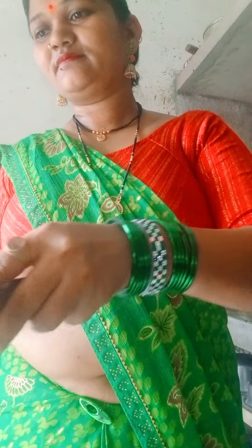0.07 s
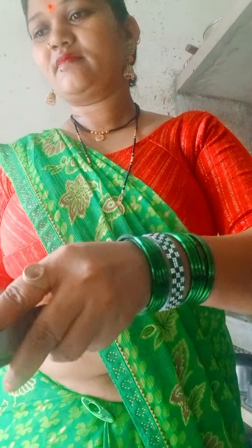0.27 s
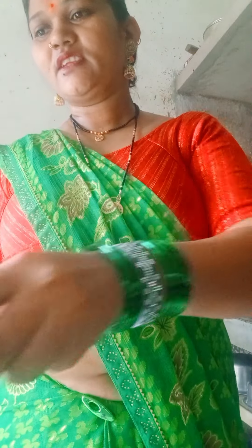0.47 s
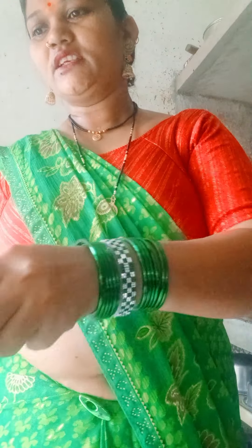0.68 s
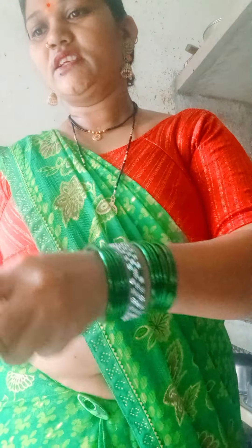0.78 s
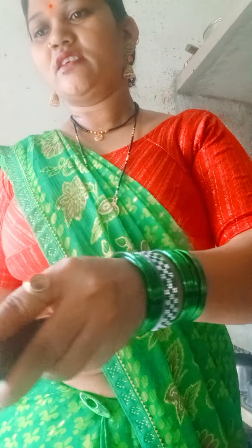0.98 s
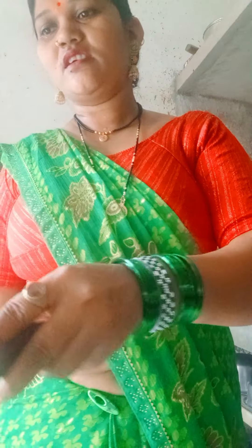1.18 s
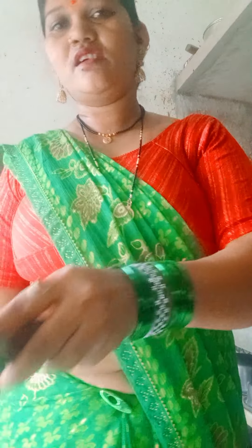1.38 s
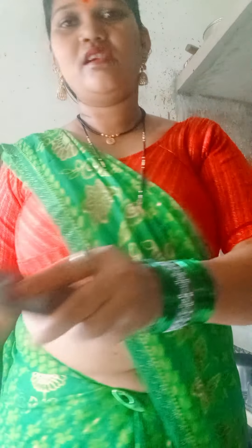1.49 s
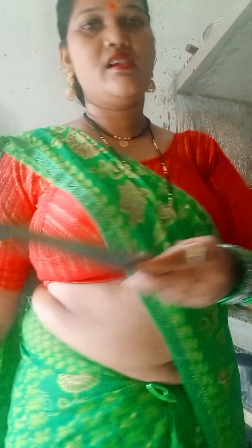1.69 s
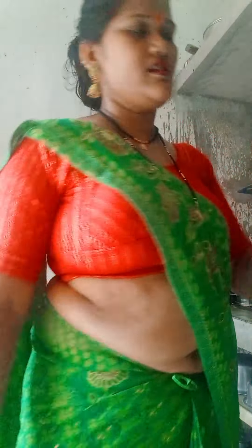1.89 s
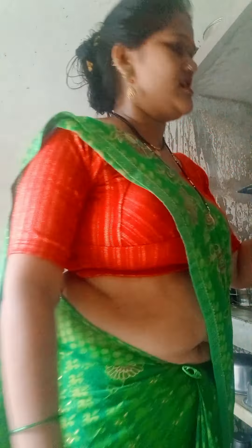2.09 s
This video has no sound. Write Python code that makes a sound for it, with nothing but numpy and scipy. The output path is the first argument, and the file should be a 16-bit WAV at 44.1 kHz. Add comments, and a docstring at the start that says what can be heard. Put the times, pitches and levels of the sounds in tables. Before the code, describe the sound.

In a small, faintly hissing kitchen, glass bangles rattle near the microphone as a wrist works to and fro. The dense, knocking clatter stops, and a few bright, ringing glass clinks follow.

```python
"""Glass bangles, stacked on a wrist, work to and fro close by in a small, faintly hissing kitchen.
Each stroke is a dense, dull clatter, likely the pressed stack and whatever the hand is working:
short damped knocks over a grinding rattle of tiny contacts, all exciting the modes of the stack.
Sliding adds faint gliding resonances. Then the arm swings away and a few loose bangles collide
and vibrate freely, clinking high and clear."""
import sys
import numpy as np
from scipy import signal
from scipy.fft import rfft, irfft
from scipy.io import wavfile
from scipy.ndimage import uniform_filter1d, minimum_filter1d

SR = 44100
rng = np.random.default_rng(int(sys.argv[2]) if len(sys.argv) > 2 else 0)


def log_audio(samples):
    """Write samples as a 16-bit WAV file to the path given in sys.argv[1]."""
    # one column per channel
    frames = np.atleast_2d(samples).T
    # limit to full scale, then quantise
    limited = np.clip(frames, -1, 1)
    pcm = np.round(limited * 32767).astype(np.int16)
    wavfile.write(sys.argv[1], SR, pcm)


N = 94770

# Spectrum of the room's hiss: frequency_hz, level_db
HISS_SPECTRUM = [(30, -16.5), (130, 1.5), (300, -0.5), (700, 3.5), (1400, 10.5), (2200, -20.5),
                 (3200, -22.5), (5000, -26.5), (9000, -29), (16000, -46)]
# Envelope of the rattle in four bands: time_s, low_db, middle_db, bright_db, treble_db
RATTLE_ENVELOPE = [(0, -27, -15.5, -21.5, -38), (0.1, -26.5, -14.5, -30, -50),
                   (0.171, -27.5, -18, -31.5, -85), (.228, -80.5, -25, -39, -80),
                   (0.242, -23, -11, -22.5, -41.5), (0.309, -26, -17.5, -16.5, -36),
                   (.38, -20, -7, -17.5, -39), (0.429, -21.5, -14, -18, -43.5),
                   (.485, -31.5, -20.5, -31.5, -53.5), (0.516, -28, -23, -24, -58),
                   (0.576, -84, -34, -61, -80), (0.59, -33, -13.5, -16.5, -36.5),
                   (0.618, -35.5, -22, -24.5, -52), (0.641, -25, -7.5, -18.5, -44),
                   (0.677, -40, -18.5, -22.5, -35.5), (0.718, -81.5, -31, -32.5, -61),
                   (0.736, -70.5, -26, -24.5, -35), (0.761, -84.5, -28.5, -29.5, -70),
                   (0.785, -31, -27, -23, -44.5), (0.821, -47, -19.5, -33.5, -71),
                   (0.86, -69, -34.5, -39.5, -84), (0.872, -43.5, -15, -20.5, -41),
                   (.92, -33.5, -16, -21.5, -36.5), (.98, -34.5, -16.5, -20, -46.5),
                   (1.031, -35, -23, -52, -56), (1.07, -64.5, -32.5, -59, -96),
                   (1.145, -74, -42.5, -56, -87), (1.156, -69, -13, -29, -48),
                   (1.188, -25.5, -12.5, -25, -41.5), (1.226, -22.5, -16, -21.5, -43.5),
                   (1.286, -38.5, -16.5, -32, -61.5), (1.326, -27, -16, -25.5, -40),
                   (1.371, -23.5, -22.5, -19.5, -71), (1.396, -23.5, -12.5, -42, -37.5),
                   (1.43, -35, -23.5, -40, -85), (1.521, -92, -46, -55.5, -76)]
# Spectrum of the contacts in each band: frequency_hz, level_db
LOW_BAND = [(330, -69.5), (560, -20), (690, 1), (760, 4), (890, 13.5), (990, -7.5), (1100, 13.5),
            (1400, -49.5)]
MIDDLE_BAND = [(820, -52), (1040, -19.5), (1190, -0.5), (1320, -7), (1800, 6), (2200, -6), (2700, -11.5),
               (3800, -44)]
BRIGHT_BAND = [(1600, -38), (2500, 11), (3000, 12), (3250, -4.5), (3600, 4.5), (4500, -6), (5000, -18.5),
               (7000, -61)]
TREBLE_BAND = [(3500, -31.5), (5000, 2.5), (6100, -1.5), (6800, -10), (8400, -6.5), (10000, -22.5),
               (11300, -20), (12500, -32), (15500, -17)]
# Damped impacts: start_s, level_db, pitch_hz, breadth (under 1 round, over 1 sharp)
KNOCKS = [(0.0136, -10.0, 1850, 0.85), (0.0335, -7.0, 1940, 0.9), (0.0539, -9.0, 1970, 1.15),
          (0.0862, -13.5, 1610, 0.7), (0.1016, -11.0, 1940, 1.15), (0.1245, -13.0, 1640, 0.8),
          (0.1418, -12.0, 1760, 1.0), (0.1716, -14.5, 2150, 0.7), (0.2013, -11.0, 1850, 0.7),
          (0.2284, -13.0, 1850, 0.7), (0.2528, -11.0, 1820, 1.3), (0.272, -11.5, 1970, 1.25),
          (0.3057, -7.0, 2270, 1.05), (0.3574, -12.5, 1880, 0.9), (0.3623, -10.0, 1580, 0.75),
          (0.366, -8.0, 1940, 1.0), (0.3722, -9.5, 1700, 1.1), (0.3975, -6.5, 2000, 1.05),
          (0.4015, -7.0, 1820, 0.55), (0.4171, -10.0, 1730, 0.95), (0.4271, -10.0, 1640, 1.3),
          (0.4771, -14.0, 1790, 1.15), (0.4938, -6.0, 1880, 1.1), (0.5006, -7.5, 1580, 1.3),
          (0.5583, -19.5, 1880, 0.8), (0.5826, -14.0, 2150, 0.75), (0.5894, -9.5, 2150, 0.9),
          (0.6387, -9.0, 1640, 0.6), (0.647, -5.5, 2060, 0.6), (0.7297, -13.5, 2330, 1.0),
          (0.7804, -7.0, 1790, 1.05), (0.7975, -13.5, 1850, 1.3), (0.8719, -11.0, 2420, 1.0),
          (0.913, -9.5, 2660, 0.95), (0.9644, -12.0, 1970, 0.75), (0.9776, -11.5, 2120, 1.2),
          (1.0237, -15.5, 1850, 0.55), (1.1784, -12.0, 1970, 0.9), (1.1841, -6.5, 2030, 0.55),
          (1.1866, -8.0, 1760, 1.3), (1.2161, -9.0, 2210, 1.05), (1.2354, -11.0, 1970, 1.0),
          (1.2505, -14.0, 2060, 1.0), (1.3021, -11.0, 2210, 0.95), (1.3211, -9.5, 2000, 1.2),
          (1.3246, -8.0, 1970, 1.1), (1.3433, -12.0, 1610, 1.3), (1.39, -8.5, 1970, 0.95),
          (1.3926, -7.5, 2270, 0.8), (1.4919, -19.0, 1850, 0.6)]
# Spectrum of a knock pitched at KNOCK_HZ: frequency_hz, level_db
KNOCK_SPECTRUM = [(300, -70), (560, -44), (820, -16), (1250, -3), (1850, 0), (2700, -5), (3700, -21),
                  (4700, -43), (6500, -68), (13000, -90)]
# Modes of the pressed stack: frequency_hz, level_db
STACK_MODES = [(689, -16.5), (880, -12.5), (1205, 0.5), (1460, 13.5), (1687, -5.5), (1832, -3.5), (1993, 3),
               (2540, 14.5), (2643, -11), (2998, -16), (3532, 2)]
# Hollow gliding resonances: start_s, length_s, start_hz, end_hz, level_db
HOLLOW_GLIDES = [(.245, .025, 1150, 1050, -26), (.28, .16, 520, 620, -52), (.768, .035, 930, 850, -31),
                 (1.15, .019, 1240, 1160, -23), (1.18, .028, 1030, 810, -29)]
# Collisions of loose bangles: start_s, level_db, tilt_db_per_octave, ring_db, t60_s (at PIVOT_HZ)
CLINKS = [(.64, -47, -5, -7, .1), (1.154, -45, -14, -14, .07), (1.6396, -47.5, 0, 2.5, .05),
          (1.6748, -41.5, 9, 3, 0.041), (1.699, -53, -4, 5, 0.042), (1.9453, -35, 0.5, 4, 0.21),
          (1.971, -29, -7.5, -11, 0.19), (1.9962, -28.5, -6.5, -2.5, 0.31), (2.0205, -18, 0.5, 1.5, 0.1),
          (2.03, -29, -11, -3.5, 0.086)]
# Modes of a free bangle: frequency_hz, level_db
BANGLE_MODES = [(3704, -16), (5276, -10), (5660, -8), (7020, -10), (8480, -4), (10090, -1), (10270, -4),
                (10720, -8), (10870, -8), (14890, -8), (15400, -6), (15730, -3)]
# Spectrum of the tick of glass on glass: frequency_hz, level_db
TICK_SPECTRUM = [(900, -75), (2500, -43), (4700, -21.5), (5400, -7), (7500, -4.5), (8500, -6), (9400, -1),
                 (10200, 7), (11200, -11), (12500, -24.5), (14500, -10), (15700, 13)]
# Faint singing of a sliding bangle: start_s, length_s, start_hz, end_hz, level_db
SINGING_GLIDES = [(1.03, 0.12, 3700, 2500, -52), (1.52, 0.35, 3130, 3800, -63.5),
                  (1.81, .17, 5730, 5470, -53), (1.8, .14, 4350, 4250, -63)]

KNOCK_HZ, CHATTER_S, CHATTER_DB = 1850, .0014, -3.5
PIVOT_HZ = 9900  # reference for the spectral tilt and damping of glass


def undb(db):
    """Decibels express an amplitude ratio on a logarithmic scale."""
    return 10 ** (np.asarray(db) / 20)


def unit(x):
    """Dividing by the root of the energy leaves an energy of one."""
    return x / np.sqrt(np.sum(x ** 2))


def seconds(length_s):
    """Uniform sampling gives the time axis of a sound."""
    return np.arange(int(length_s * SR)) / SR


def add(out, start_s, x):
    """Superposition: x adds to out from its start time."""
    i = max(int(start_s * SR), 0)
    out[i:i + len(x)] += x[:max(N - i, 0)]


def through(x, response):
    """A linear system convolves its input with its impulse response."""
    return signal.fftconvolve(x, response)[:len(x)]


def colour(spectrum, size=2048):
    """A magnitude spectrum determines a minimum-phase impulse response, here of unit energy."""
    hz, db = np.array(spectrum, float).T
    f = np.maximum(np.fft.rfftfreq(size, 1 / SR), 1)
    roll_off = np.minimum(hz[-1] / f, 1) ** 3
    magnitude = roll_off * undb(np.interp(np.log(f), np.log(hz), db))
    cepstrum = irfft(np.log(magnitude))
    cepstrum[1:size // 2] *= 2  # folding makes the response causal
    cepstrum[size // 2 + 1:] = 0
    return unit(irfft(np.exp(rfft(cepstrum))))


def signs(count):
    """Random polarity: each contact or mode starts upward or downward."""
    return rng.choice([-1, 1], count)


def ring(modes, t60_s, gains, detune=0, damping=0):
    """Free vibration is a sum of decaying modes; damping makes the higher ones die sooner."""
    t = seconds(.5)
    out = np.zeros(len(t))
    tunings = 1 + detune * rng.standard_normal(len(modes))
    for (hz, db), gain, tuning in zip(modes, gains, tunings):
        decay = np.exp(-np.log(1000) * t / t60_s * (hz / PIVOT_HZ) ** damping)
        out += gain * undb(db) * decay * np.sin(2 * np.pi * hz * tuning * t)
    return out


def burst(decay_s):
    """Exponential decay: noise falls by a factor of e in each decay_s."""
    t = seconds(.5)
    return rng.standard_normal(len(t)) * np.exp(-t / decay_s)


def room_hiss(level_db=-53):
    """Stationary filtered noise gives the room its soft hiss."""
    return undb(level_db) * through(rng.standard_normal(N), colour(HISS_SPECTRUM))


def ringing_contacts(rate_per_s=900, low_hz=700, high_hz=12000, decay_s=.011):
    """Each tiny contact rings as a damped oscillator with a pitch of its own."""
    out, t = np.zeros(N), seconds(.097)
    for when, pitch in rng.random((int(rate_per_s * N / SR), 2)):
        hz = low_hz * (high_hz / low_hz) ** pitch
        add(out, when * N / SR, np.sqrt(hz) * np.exp(-t / decay_s) * np.sin(2 * np.pi * hz * t))
    return out / np.std(out)


def rattle(rate_per_s=900, spread_db=4, ringing_db=-3, edge_db=18, grit_s=.007, grit_db=4, gain_db=-4.5):
    """Countless random contacts merge into shot noise in four bands; each knock stirs the treble."""
    strengths = undb(spread_db * np.minimum(rng.exponential(size=N), 3.5))
    impulses = (rng.random(N) < rate_per_s / SR) * strengths * signs(N)
    contacts = (impulses / np.std(impulses) + undb(ringing_db) * ringing_contacts()) / 2
    edges = np.zeros(N)
    for start_s, level_db, _, _ in KNOCKS:
        add(edges, start_s, undb(edge_db + level_db / 2) * unit(burst(CHATTER_S)))
    flicker = uniform_filter1d(rng.standard_normal(N), int(grit_s * SR))
    grit = contacts * undb(grit_db * flicker / np.std(flicker))
    drives = (contacts, contacts, contacts, grit + edges)
    bands = (LOW_BAND, MIDDLE_BAND, BRIGHT_BAND, TREBLE_BAND)
    time_s, *band_levels = np.array(RATTLE_ENVELOPE).T
    out, t = np.zeros(N), np.arange(N) / SR
    for drive, band, levels_db in zip(drives, bands, band_levels):
        envelope = undb(np.interp(t, time_s, levels_db) + gain_db)
        out += through(drive * envelope, colour(band))
    return out


def knocks():
    """Heavy damping ends each impact in a cycle or two; a short chatter follows."""
    out = np.zeros(N)
    impact_gain = np.sqrt(SR / 1000)  # the energy of 1 ms at unit amplitude
    for start_s, level_db, pitch_hz, breadth in KNOCKS:
        onset = 1 - np.exp(-seconds(.5) / CHATTER_S)
        force = undb(CHATTER_DB) * unit(burst(CHATTER_S) * onset)
        force[0] += 1  # the blow itself
        spectrum = [(pitch_hz * (hz / KNOCK_HZ) ** (breadth if hz > KNOCK_HZ else min(breadth, 1)), db)
                    for hz, db in KNOCK_SPECTRUM]
        add(out, start_s, undb(level_db) * impact_gain * through(force[:2048], colour(spectrum)))
    return out


def pressed_stack(drive, body_db=-18, shimmer_db=-21, shimmer_hz=(3067, 11550)):
    """Forced vibration: every contact excites the stack's damped body and a shimmer of high modes."""
    body = unit(ring(STACK_MODES, t60_s=.07, gains=signs(len(STACK_MODES))))
    high_modes = [(hz, 0) for hz in np.geomspace(*shimmer_hz, 2 * len(STACK_MODES))]
    shimmer = unit(ring(high_modes, t60_s=.25, gains=signs(len(high_modes)), detune=.021))
    return drive + through(drive, undb(body_db) * body + undb(shimmer_db) * shimmer)


def rubbed_resonances(glides, width_hz, swell_power):
    """Friction drives a resonance as narrow-band noise that swells, glides in pitch and fades."""
    out = np.zeros(N)
    lowpass = signal.butter(2, width_hz / 2, fs=SR, output="sos")
    for start_s, length_s, start_hz, end_hz, level_db in glides:
        t = seconds(length_s)
        noise = rng.standard_normal(N) + 1j * rng.standard_normal(N)
        grain = signal.sosfilt(lowpass, noise)[-len(t):]
        pitch_hz = start_hz + (end_hz - start_hz) * t / length_s
        tone = (grain * np.exp(2j * np.pi * np.cumsum(pitch_hz) / SR)).real
        envelope = np.sin(np.pi * t / length_s) ** swell_power
        add(out, start_s, undb(level_db) * envelope * tone / np.std(tone))
    return out


def clinks(bangles=3, scatter_db=2.5, tick_s=.0048, glass_db=-16.5):
    """A collision radiates a bright tick, then loose bangles ring in slightly mistuned, beating modes."""
    out = np.zeros(N)
    octaves = np.log2(np.array(BANGLE_MODES)[:, 0] / PIVOT_HZ)
    for start_s, level_db, tilt, ring_db, t60_s in CLINKS:
        gains = undb(tilt * octaves + scatter_db * rng.standard_normal(len(octaves)))
        rings = sum(ring(BANGLE_MODES, t60_s, gains * signs(len(gains)), detune=.007, damping=.7)
                    for _ in range(bangles))
        rings *= undb(glass_db + ring_db) / np.sqrt(bangles)
        spectrum = [(hz, db + tilt * np.log2(hz / PIVOT_HZ)) for hz, db in TICK_SPECTRUM]
        tick = through(burst(tick_s), colour(spectrum))
        add(out, start_s, undb(level_db) * (rings + tick))
    return out


def kitchen(x, wet_db, t60_s=.28, delay_s=.005, linger_t60_s=1.3, linger_db=-38):
    """Reverberation: reflections from hard walls form a short, dense tail; the midrange lingers."""
    onset = np.clip(seconds(.5) / delay_s - 1, 0, 1)
    tail = unit(burst(t60_s / np.log(1000)) * onset)
    slow_decay = np.exp(-np.log(1000) * np.arange(N) / SR / linger_t60_s)
    linger = unit(through(rng.standard_normal(N), colour(MIDDLE_BAND)) * slow_decay)
    return x + undb(linger_db) * through(x, linger) + undb(wet_db) * through(x, tail)


def scene():
    """Sound pressures add: clatter and clinks reverberate in the kitchen, over its hiss."""
    loose = clinks() + rubbed_resonances(SINGING_GLIDES, width_hz=110, swell_power=4)
    mix = kitchen(loose, wet_db=-12) + room_hiss()
    clatter = knocks() + rubbed_resonances(HOLLOW_GLIDES, width_hz=70, swell_power=.63) + rattle()
    mix += kitchen(pressed_stack(clatter), wet_db=-12.5)
    return mix[None]


def record(dry, ceiling=.85, limiter_s=.002, cutoff_hz=15900):
    """Limiting lowers the gain briefly around peaks; a steep low-pass removes the highest treble."""
    size = int(limiter_s * SR)
    gain = minimum_filter1d(ceiling / np.maximum(np.abs(dry), ceiling), 2 * size)
    smooth_gain = uniform_filter1d(uniform_filter1d(gain, size), size)
    lowpass = signal.ellip(10, .2, 70, cutoff_hz, fs=SR, output="sos")
    return signal.sosfilt(lowpass, dry * smooth_gain)


dry = scene()
out = record(dry)
log_audio(out)
```